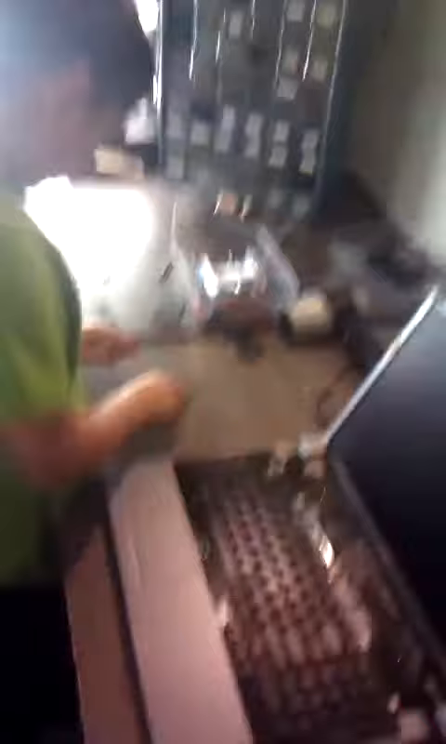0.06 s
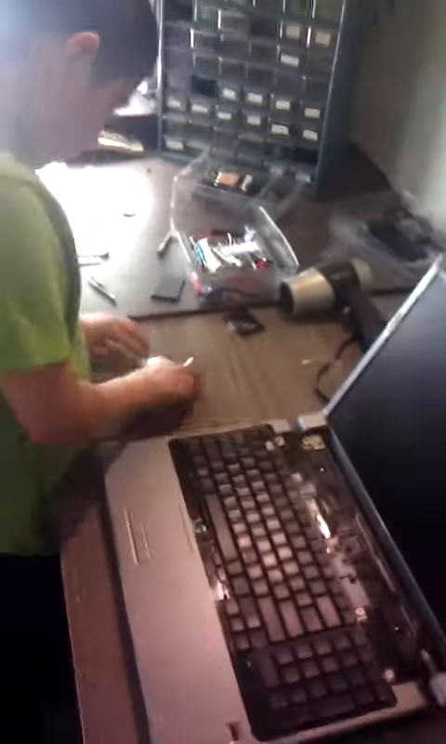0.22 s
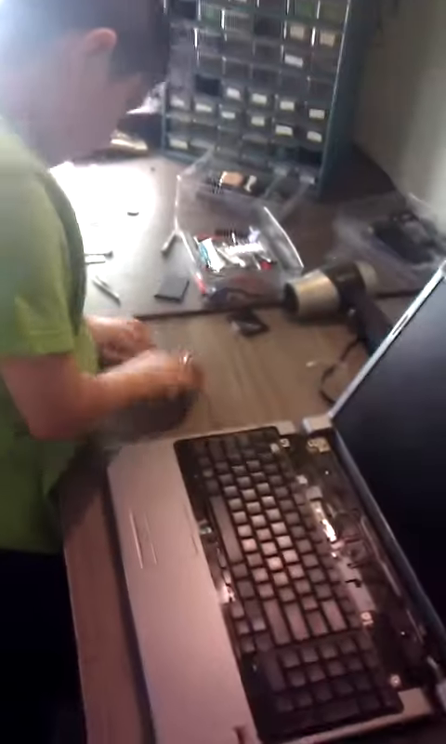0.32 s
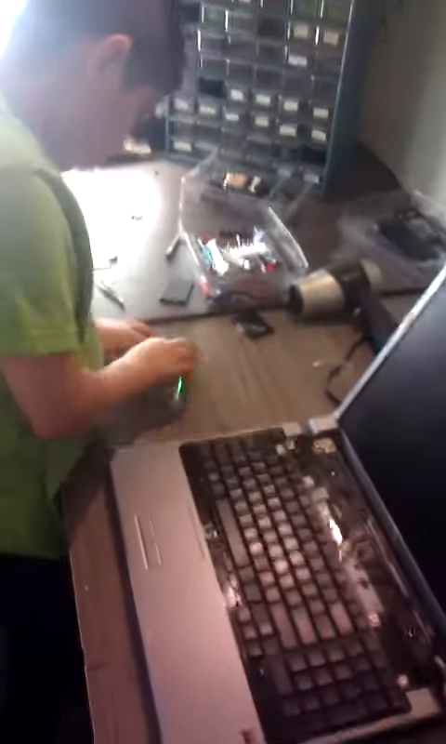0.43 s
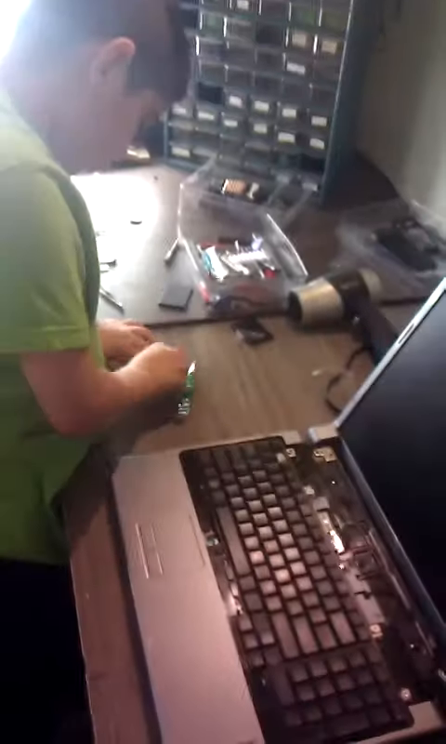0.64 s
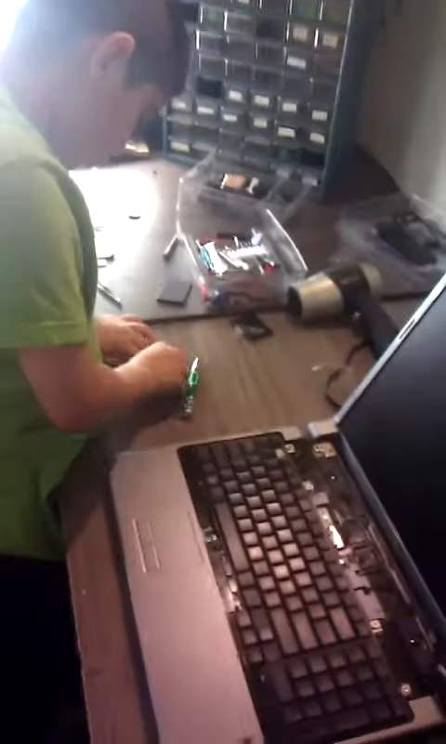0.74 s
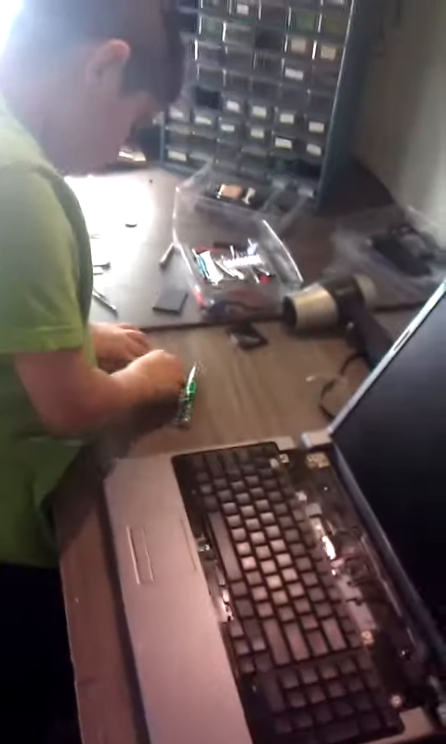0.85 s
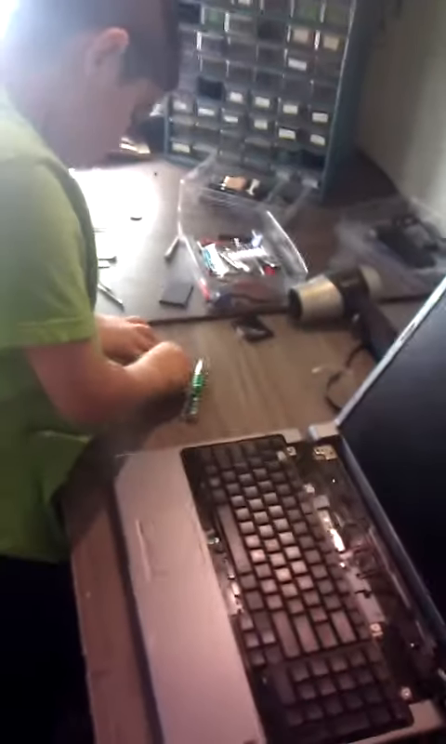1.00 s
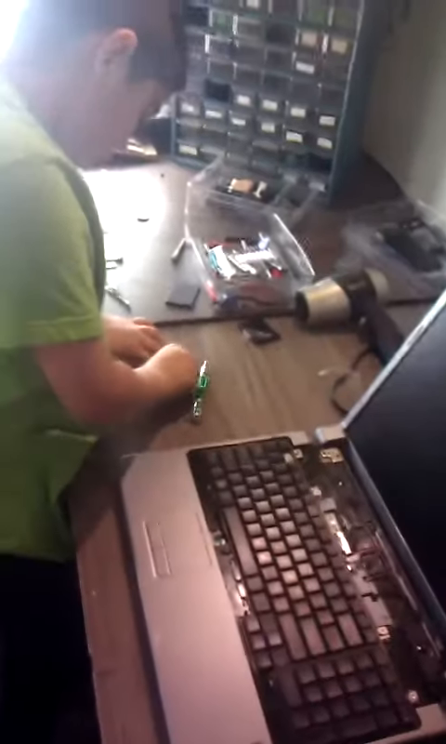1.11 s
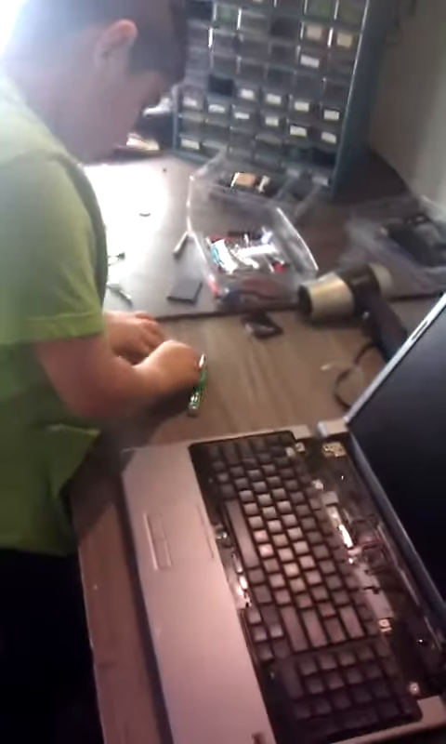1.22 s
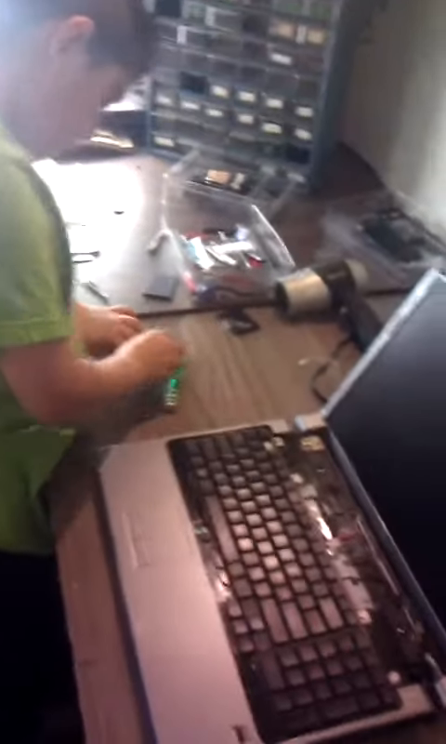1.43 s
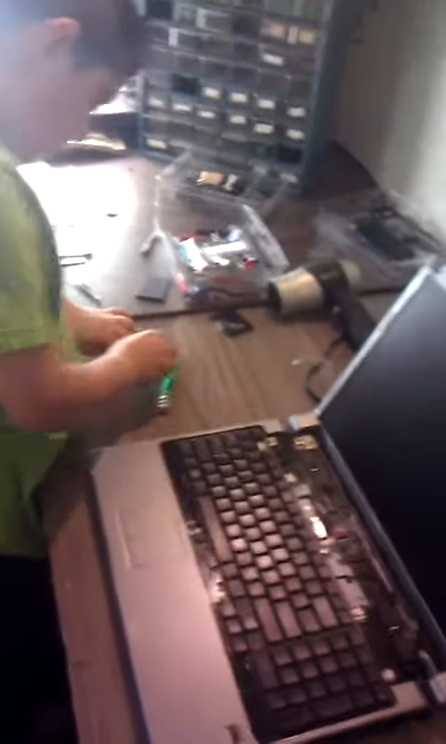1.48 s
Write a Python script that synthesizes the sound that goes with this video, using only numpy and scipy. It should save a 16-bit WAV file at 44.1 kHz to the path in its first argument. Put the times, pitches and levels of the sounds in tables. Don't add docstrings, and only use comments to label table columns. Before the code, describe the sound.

Metal parts knock on a desk top: a faint tick, a sharp drop and rapid tumbling rattle early, a double tap midway, a small set-down click near the end, in a quiet humming room, dull phone sound.

```python
import sys
import numpy as np
from scipy import signal
from scipy.fft import rfft, irfft
from scipy.io import wavfile
from scipy.ndimage import uniform_filter1d

SR = 44100
rng = np.random.default_rng(int(sys.argv[2]) if len(sys.argv) > 2 else 0)


def volts_from_decibels(level):
    exponent = np.asarray(level, float) / 20
    return 10 ** exponent


def waveform_to_disk(signal):
    frames = np.transpose(np.atleast_2d(signal))
    scaled = np.clip(frames, -1, 1) * 32767
    samples = np.round(scaled).astype(np.int16)
    wavfile.write(sys.argv[1], SR, samples)


N = 68355

# (frequency [Hz], level [dB])
ROOM_SPECTRUM = [(150, -30.5), (240, -3), (480, -2.5), (1200, -8), (2200, -6), (3300, -15), (5800, -33),
                 (8000, -27.5)]
# (frequency [Hz], level [dB])
RUMBLE_SPECTRUM = [(20, -31.5), (85, -29), (105, -1), (128, -11.5), (145, -36.5), (200, -22.5), (260, -48)]
# (frequency [Hz], width [Hz], level [dB])
FAN_RESONANCES = [(111.3, 15, -74), (280, 52, -64), (421, 106, -59), (7490, 1000, -77)]
ROOM_DB, SWELL_DB = -51, 0.5

# (time [s], peak level [dB], length [s], centre frequency [Hz])
RASPS = [(0.039, -49.5, 0.015, 4320), (.259, -38, 0.006, 3500), (0.2, -37, 0.013, 4400),
         (0.2, -45.5, 0.015, 7400), (0.2985, -41, 0.01, 6800), (1.2105, -49, 0.004, 4300),
         (1.277, -39.5, 0.00173, 3540), (1.284, -42.5, 0.015, 4200), (1.306, -49.5, 0.016, 4200),
         (1.337, -47, 0.0044, 2500), (1.338, -42.5, 0.016, 3960), (1.3625, -37, 0.0077, 3300),
         (1.371, -39.5, 0.0037, 3000), (1.385, -54, 0.0045, 3300), (0.7405, -44, 0.0073, 5900),
         (1.25, -50, 0.022, 6840), (0.283, -46, 0.008, 6800), (.253, -56.5, 0.027, 6200),
         (.312, -57, .04, 5800), (.215, -54, 0.026, 6400)]
# (frequency [Hz], level [dB])
STEEL_SPECTRUM = [(350, -50), (600, -10), (1310, -3), (2250, 15.5), (2820, 3), (3570, 9), (5580, -7),
                  (7810, -3), (8740, -9.5), (11400, -45.5), (19200, -120)]
STEEL_PEAK_DB, STEEL_WIDTH_OCT = 9.5, 0.32
STEEL_TAIL_DB, STEEL_TAIL_S = -23, 0.073
GRIT_DB = 3.5

# (time [s], peak level [dB], frequency [Hz], t60 [s])
PINGS = [(0.0403, -47, 4100, .02), (.0474, -39, 4280, 0.0094), (.048, -42.5, 2910, .03),
         (0.0573, -30, 3120, 0.0076), (0.058, -31.5, 4500, 0.0072), (0.058, -37.5, 7500, 0.0055),
         (.1995, -24.5, 3410, .025), (.204, -37, 4400, .04), (0.205, -45, 7300, 0.032),
         (.2815, -20, 2300, 0.039), (.2985, -16.5, 3310, 0.013), (0.2999, -31, 2890, 0.045),
         (.3, -24, 1935, .09), (.301, -27, 2620, .1), (.301, -29, 2185, .12), (.2005, -26, 2610, .1),
         (.615, -44, 1050, .1), (.615, -44, 1270, .1), (.616, -41, 1765, .1), (.742, -36, 1060, .07),
         (.7405, -34, 3860, 0.017), (.749, -39.5, 3810, .025), (.75, -40.5, 908.6, 0.28),
         (1.255, -33, 3840, 0.011), (1.2815, -34, 7850, 0.0078), (1.2815, -40, 4230, 0.017),
         (1.3085, -43.5, 7900, .007), (1.364, -33, 3510, 0.035), (1.364, -42, 6700, 0.014),
         (1.3735, -44, 5000, .003), (1.45, -50, 887, .1)]
# (time [s], peak level [dB], frequency [Hz], t60 [s])
THUDS = [
    (0.201, -31, 303, 0.047),
    (0.283, -45, 299, .08),
    (.299, -32.5, 245.6, .1),
    (0.346, -37.5, 273, 0.071),
    (0.442, -36, 268, 0.074),
    (.598, -34, 272, 0.065),
    (0.743, -42, 295, 0.025),
]
PING_RISE_S, THUD_RISE_S = 0.00021, 0.005

# (time [s], peak level [dB], brightness [dB per octave], ring share [1])
DROP_KNOCKS = [
    (.1993, -24, 0.5, 0.65),
    (.205, -29.5, 6, 0.8),
    (.214, -36.5, 6.5, 1),
]
# (time [s], peak level [dB], brightness [dB per octave], ring share [1])
TUMBLE_KNOCKS = [(.2525, -30, 3.5, 1.7), (.2605, -30, 3, 0.93), (.268, -29.5, -4.5, 0.63),
                 (.281, -26.5, -3, 0.49), (.292, -36, 1, 0.45), (.2985, -20, 2, 0.91),
                 (.307, -33.5, 2.5, 0.48), (.320, -36, -4, 1.08), (.333, -36, -2, 0.64),
                 (.347, -37.5, -2, 1), (.374, -44, -7, .8), (.615, -44.5, -4.5, 0.87),
                 (.620, -43, -2, 0.44), (.626, -45, -3, 0.25)]
# (time [s], peak level [dB], brightness [dB per octave], ring share [1])
TAP_KNOCKS = [
    (.736, -50, -9, 0.51),
    (.7405, -26.5, 1, 0.45),
    (.749, -29.5, 0, 0.58),
    (.761, -38, -3, .7),
    (.808, -51.5, -3, 1.1),
    (.836, -51.5, 12.5, .5),
]
# (time [s], peak level [dB], brightness [dB per octave], ring share [1])
SET_DOWN_KNOCKS = [
    (1.19, -55, -8, 1.1),
    (1.218, -50.5, -4.5, 1.1),
    (1.247, -38.5, -3.5, 0.36),
    (1.2545, -26.5, 3.5, 0.53),
    (1.263, -30, 1, 0.4),
    (1.273, -38, -1, 0.49),
    (1.4475, -41.5, -1.5, 0.39),
]
DESK_HZ = [670, 907, 1044, 1265, 1405, 1597, 1757, 1802, 1935, 2185, 2255, 2400, 2620, 3045]
# (level [dB], t60 [s])
DROP_MODES = [(-18.5, .15), (-20, .15), (-10.5, .15), (-12, 0.098), (1.5, 0.13), (-6, 0.11), (-10, .1),
              (0.5, .12), (3, .12), (-10, 0.101), (0.5, .1), (-12, .1), (4, 0.14), (-5, .1)]
# (level [dB], t60 [s])
TUMBLE_MODES = [(-10.5, .15), (-6.5, .2), (-8, 0.19), (-11, .15), (-3.5, 0.16), (-12, 0.13), (6, .15),
                (1, .13), (-2, .12), (-4.5, .15), (-5.5, 0.12), (-6, .2), (-4.5, 0.16), (-7.5, .12)]
# (level [dB], t60 [s])
TAP_MODES = [(-7.5, .22), (-5.5, .25), (-7, .1), (-14, .15), (-9, .15), (-2.5, .2), (-2, .25), (-10, .1),
             (-1, .15), (4.5, .14), (2, 0.17), (-5, .15), (-8.5, .15), (-19, .1)]
# (level [dB], t60 [s])
SET_DOWN_MODES = [(-5, .25), (-3, 0.23), (-3, 0.21), (-6.5, 0.24), (-14, 0.14), (-12, .2), (-14, .15),
                  (-14, .15), (-2, .15), (-0.5, .15), (4.5, .15), (4.5, .2), (1.5, .15), (-6, .12)]
# (body level [dB], crack level [dB], crack frequency [Hz])
SPOTS = [
    (-1.5, -0.5, 3350),
    (-2, -1.5, 2660),
    (-3.5, 3, 2230),
    (-5, 2, 2500),
]
# (frequency [Hz], level [dB])
BODY_SPECTRUM = [(71, -55), (120, -39), (250, -7), (1240, -1.5), (1770, 4.5), (3030, -4), (5010, -29),
                 (7570, -37.5), (8740, -36.5), (11400, -63.5), (19200, -120)]
# (frequency [Hz], t60 [s])
BODY_T60 = [(200, 0.17), (700, 0.31), (2000, 0.14), (3500, 0.16), (6000, 0.2), (8000, 0.13)]
DETUNE, PHASE_CYCLES = 0.002, 0.19
CRACK_S, CRACK_WIDTH_HZ = 0.0023, 1020
RISE_S = 0.00045

# (time [s], level [dB])
SLIDE_PRESSURE = [(.4, -46), (.55, -69), (.7, -65.5), (.85, -54.5), (1.049, -56), (1.15, -61.5),
                  (1.23, -53.5), (1.32, -55.5), (1.5, -93.5)]
# (frequency [Hz], width [Hz], level [dB])
SLIDE_RESONANCES = [(2300, 230, -1), (1780, 340, -5.5), (830, 210, -8.5), (2950, 300, -13.5)]
SLIDE_DB, SLIDE_GRIT_DB = 3.5, 0.5

BASS_CUT_HZ = 166
MASK_FROM_HZ, MASK_BAND_HZ, MASK_DB = 5300, 700, -37.5
EDGE_HZ, HISS_DB = 8500, -92


def evened(x):
    return x / np.sqrt(np.mean(x ** 2) + 1e-20)


def read(points, hz):
    f, value = np.transpose(points)
    return np.interp(np.log(hz + 1), np.log(f + 1), value)


def add(mix, s, sound):
    part = mix[round(s * SR):][:len(sound)]
    part += sound[:len(part)]


def colour(x, db_at):
    gain = volts_from_decibels(db_at(np.fft.rfftfreq(len(x), 1 / SR)))
    return irfft(rfft(x) * gain, len(x))


def resonate(x, hz, width):
    turn = np.exp(2j * np.pi * hz * np.arange(len(x)) / SR)
    r = np.exp(-np.pi * width / SR)
    return 2 * (turn * signal.lfilter([1 - r], [1, -r], x / turn)).real


def resonate_twice(x, hz, width):
    return resonate(resonate(x, hz, width), hz, width)


def room():
    frames, hz = N // 256 + 5, np.fft.rfftfreq(1024, 1 / SR)
    real, imag = rng.standard_normal((2, frames, len(hz)))
    swell = evened(uniform_filter1d(rng.standard_normal(frames), size=20))
    upper = volts_from_decibels(read(ROOM_SPECTRUM, hz)) * (hz > 170)
    rumble = volts_from_decibels(read(RUMBLE_SPECTRUM, hz)) * (hz < 260)
    spectrum = (real + 1j * imag) * np.hypot(upper, rumble) * volts_from_decibels(SWELL_DB * swell)[None].T
    hum = volts_from_decibels(ROOM_DB) * evened(signal.istft(spectrum.T, nperseg=1024, noverlap=768)[1][:N])
    air = rng.standard_normal(N)
    for resonance_hz, width, db in FAN_RESONANCES:
        hum = hum + volts_from_decibels(db) * evened(resonate_twice(air, resonance_hz, width))
    return hum


def rasp(peak_db, length, centre_hz):
    t = np.arange(4096) / SR
    unevenness = evened(uniform_filter1d(rng.standard_normal(len(t)), size=40))
    grit = rng.standard_normal(len(t)) * volts_from_decibels(GRIT_DB * unevenness)

    def steel_db(hz):
        octaves = np.log2((hz + 1) / centre_hz)
        return read(STEEL_SPECTRUM, hz) + STEEL_PEAK_DB * np.exp(-(octaves / STEEL_WIDTH_OCT) ** 2)

    contact = np.exp(-(t / length) ** 3)
    shape = contact + volts_from_decibels(STEEL_TAIL_DB) * np.exp(-t / STEEL_TAIL_S)
    steel = colour(grit, steel_db)
    steel = steel * np.linalg.norm(shape) / np.linalg.norm(shape * steel)
    return volts_from_decibels(peak_db) * np.minimum(t / RISE_S, 1) * shape * steel


def damped_mode(peak_db, hz, t60, rise_s):
    t = np.arange(8192) / SR
    return volts_from_decibels(peak_db - 60 * t / t60) * (1 - np.exp(-t / rise_s)) * np.sin(2 * np.pi * hz * t)


def desk_ring(t, modes, tilt, share):
    ring = np.zeros(len(t))
    chance = rng.standard_normal((len(modes), 2))
    for hz, (db, t60), (u, v) in zip(DESK_HZ, modes, chance):
        decay = volts_from_decibels(db + tilt(hz) - 60 * t / (share * t60))
        cycles = hz * (1 + DETUNE * u) * t + PHASE_CYCLES * v
        ring += decay * np.sign(u) * np.sin(2 * np.pi * cycles)
    return ring / np.sqrt(sum(volts_from_decibels(2 * db) for db, _ in modes) / 2)


def desk_body(noise, share):
    hz, frames, z = signal.stft(noise, SR, nperseg=128)
    t60 = share * read(BODY_T60, hz)[:, None]
    return signal.istft(z * volts_from_decibels(-60 * frames / t60), SR, nperseg=128)[1][:len(noise)]


def knock(peak_db, bright_db, share, modes, body_db, crack_db, crack_hz):
    t = np.arange(16384) / SR

    def tilt(hz):
        return bright_db * np.log2(np.clip(hz, 200, 9000) / 2000)

    ring = desk_ring(t, modes, tilt, share)
    wood = colour(rng.standard_normal(len(t)), lambda hz: read(BODY_SPECTRUM, hz))
    noise = colour(evened(wood), tilt)
    body = desk_body(noise, share)
    crack = resonate_twice(noise[::-1], crack_hz, CRACK_WIDTH_HZ) * np.exp(-t / CRACK_S)
    crack = crack / abs(crack).max()
    onset = 1 - np.exp(-t / RISE_S)
    return volts_from_decibels(peak_db) * onset * (ring + volts_from_decibels(body_db) * body + 2 * volts_from_decibels(crack_db) * crack)


def slide():
    s, db = np.transpose(SLIDE_PRESSURE)
    t = np.arange(N) / SR
    unevenness = evened(uniform_filter1d(rng.standard_normal(N), size=500))
    grit = rng.standard_normal(N) * volts_from_decibels(SLIDE_GRIT_DB * unevenness)
    rung = np.zeros(N)
    for hz, width, gain_db in SLIDE_RESONANCES:
        rung += volts_from_decibels(gain_db) * evened(resonate_twice(grit, hz, width))
    fade_in = np.clip((t - s[0]) / 0.062, 0, 1)
    return volts_from_decibels(SLIDE_DB + np.interp(t, s, db)) * fade_in * rung


def scene():
    mix = np.zeros(N)
    for s, *how in RASPS:
        add(mix, s, rasp(*how))
    for s, *how in PINGS:
        add(mix, s, damped_mode(*how, PING_RISE_S))
    for s, *how in THUDS:
        add(mix, s, damped_mode(*how, THUD_RISE_S))
    knocks = DROP_KNOCKS, TUMBLE_KNOCKS, TAP_KNOCKS, SET_DOWN_KNOCKS
    mode_sets = DROP_MODES, TUMBLE_MODES, TAP_MODES, SET_DOWN_MODES
    for hits, modes, spot in zip(knocks, mode_sets, SPOTS):
        for s, *how in hits:
            add(mix, s, knock(*how, modes, *spot))
    bass_cut = signal.butter(4, BASS_CUT_HZ, "high", fs=SR, output="sos")
    return (signal.sosfilt(bass_cut, mix + slide()) + room())[None]


def masked(x):
    hz, _, z = signal.stft(x, SR, nperseg=256)
    power, keep = abs(z) ** 2, np.ones(z.shape)
    whole = uniform_filter1d(power.sum(0), size=5)
    for lo in np.arange(MASK_FROM_HZ, EDGE_HZ, MASK_BAND_HZ):
        band = (hz >= lo) & (hz < lo + MASK_BAND_HZ)
        keep[band] = uniform_filter1d(power[band].sum(0), size=5) > whole * volts_from_decibels(2 * MASK_DB)
    return signal.istft(z * keep, SR, nperseg=256)[1][:N]


def top_cut(x):
    return signal.sosfilt(signal.butter(12, 8890, fs=SR, output="sos"), x)


def record(dry):
    low_pass = signal.firwin(151, EDGE_HZ, window=("kaiser", 7), fs=SR)
    limited = signal.oaconvolve(masked(dry[0])[None], low_pass[None], "same")
    mix = limited + volts_from_decibels(HISS_DB) * rng.standard_normal(dry.shape)
    return top_cut(mix)


dry = scene()
out = record(dry)
waveform_to_disk(out)
```